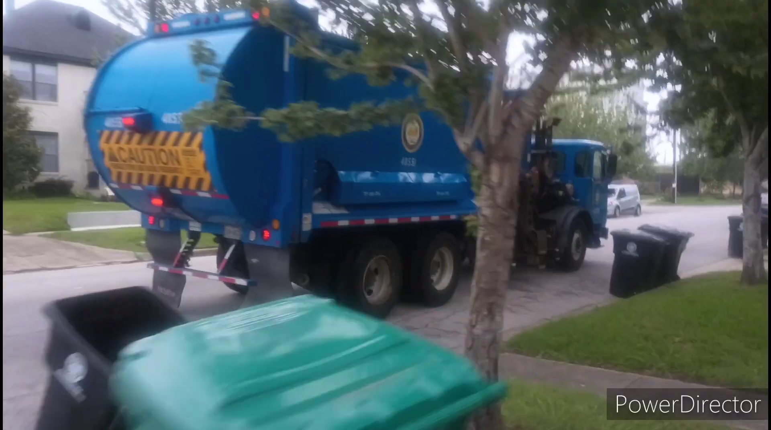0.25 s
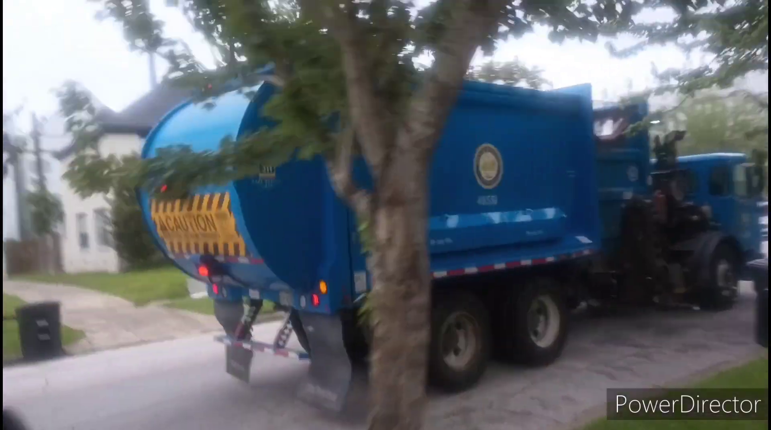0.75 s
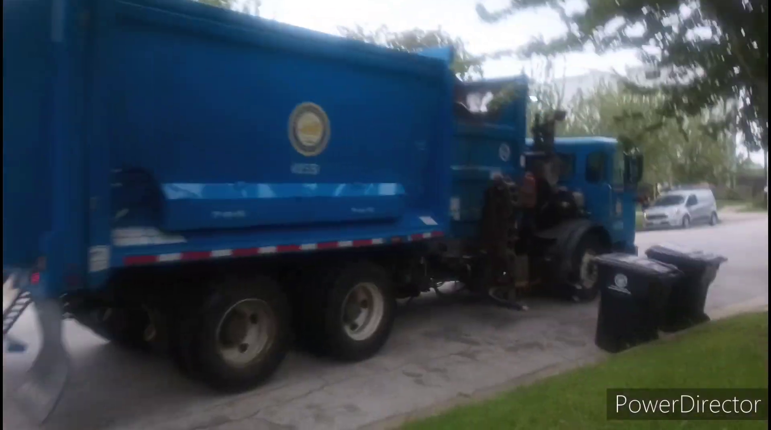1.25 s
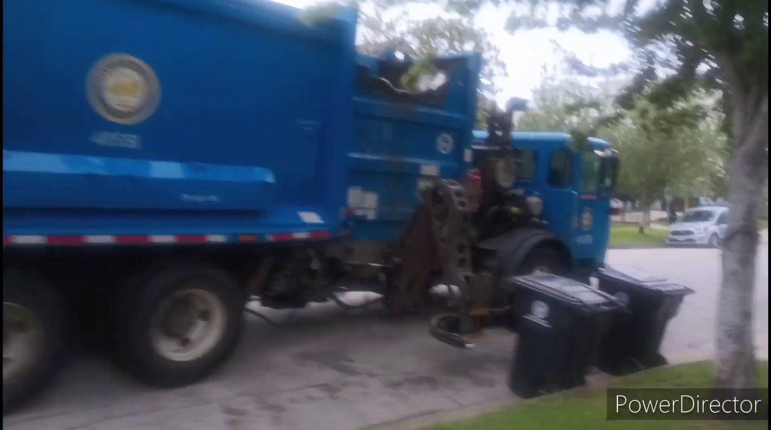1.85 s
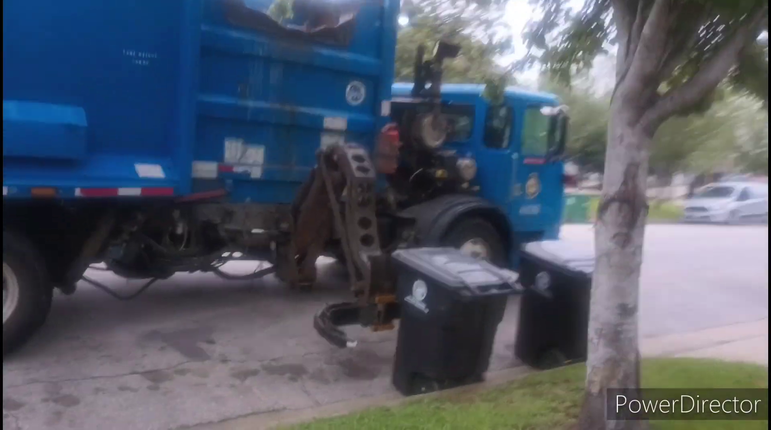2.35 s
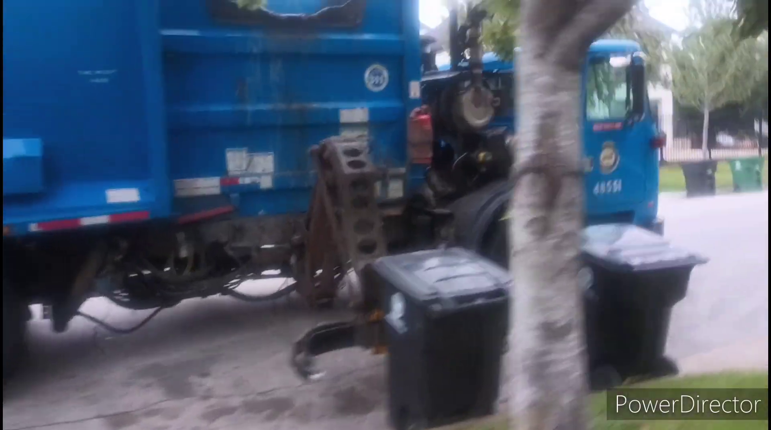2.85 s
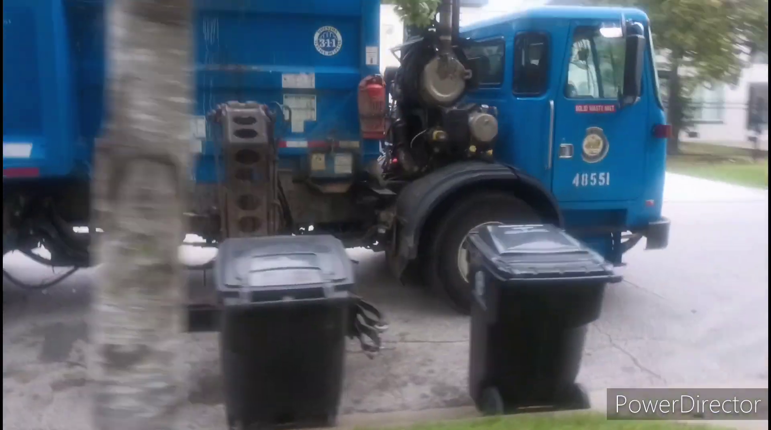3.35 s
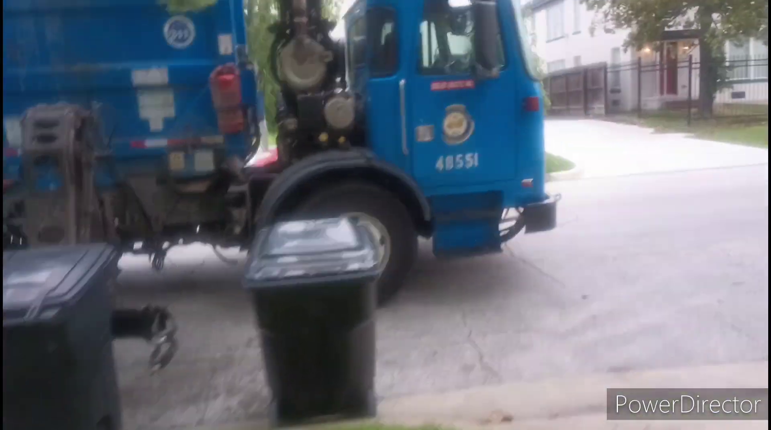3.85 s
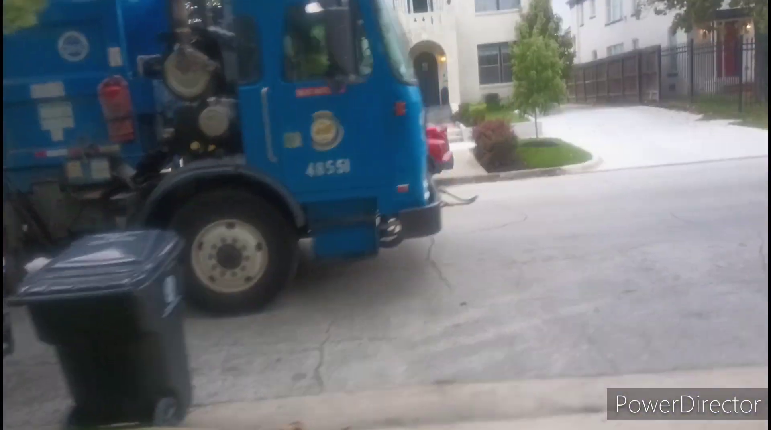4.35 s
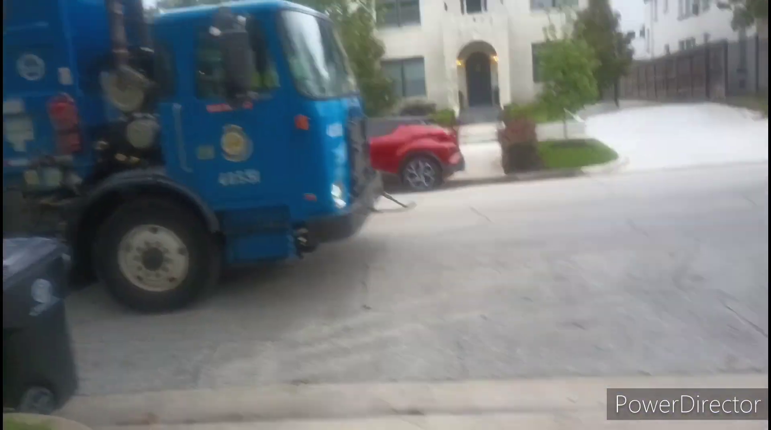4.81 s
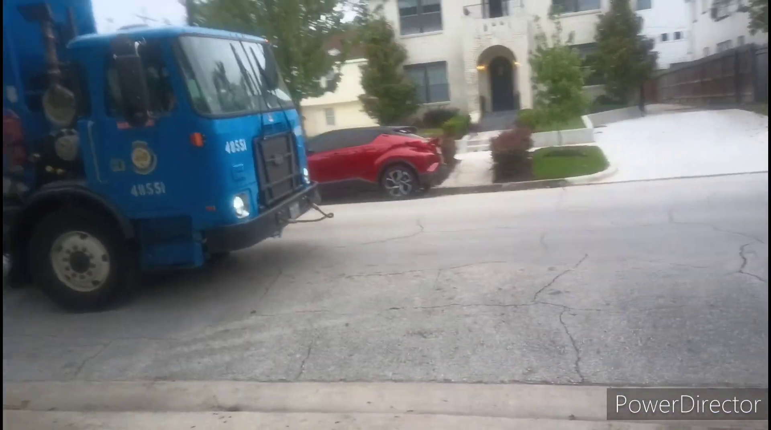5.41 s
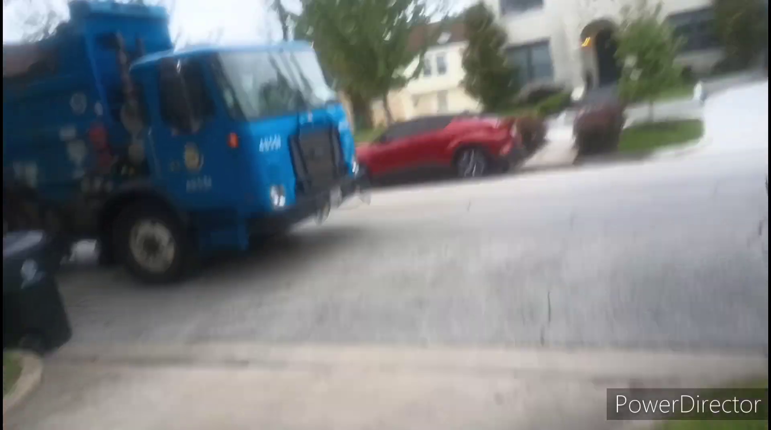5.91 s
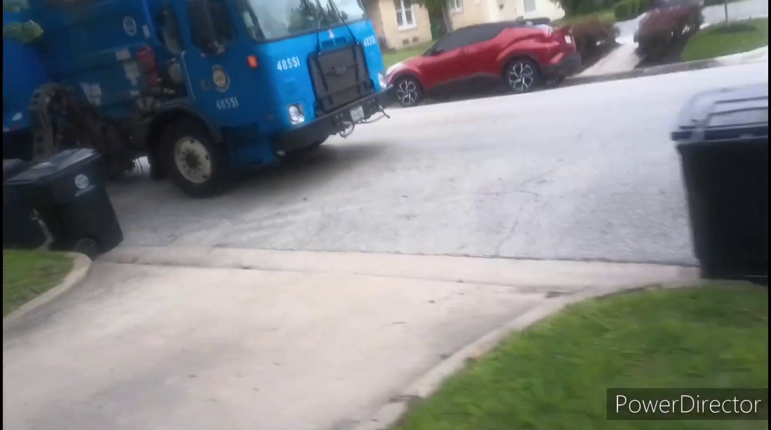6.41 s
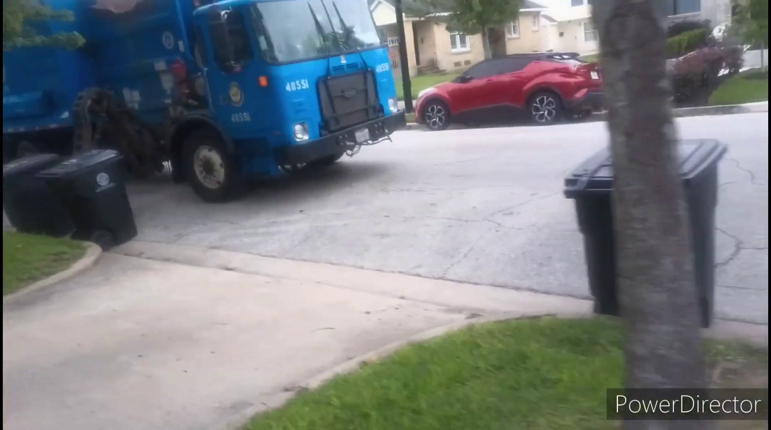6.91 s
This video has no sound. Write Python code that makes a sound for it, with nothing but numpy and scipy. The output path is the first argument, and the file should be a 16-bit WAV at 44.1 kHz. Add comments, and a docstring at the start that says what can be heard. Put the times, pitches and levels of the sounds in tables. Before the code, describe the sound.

Wind buffets the microphone as a diesel garbage truck pulls up with squealing brakes and clanks, idles, then blasts its air brake.

```python
"""Wind buffets the microphone as a diesel refuse truck pulls up; the sound cuts out briefly.
Its brake discs squeal, the steel body clanks and a valve puffs air. The engine idles, heard mostly
from the side, covers buzzing and lifting-arm links clinking. Then the parking brake dumps its air:
a loud blast, and a thin bleed with a falling whistle. The idle ends a little duller and quieter."""
import sys
import numpy as np
from scipy import signal
from scipy.fft import rfft, irfft, next_fast_len
from scipy.io import wavfile
from scipy.ndimage import uniform_filter1d, map_coordinates

SR = 44100
rng = np.random.default_rng(int(sys.argv[2]) if len(sys.argv) > 2 else 0)


def unload_wav(signal):
    """Save mono or channel-first audio to the path in sys.argv[1] as 16-bit WAV at rate SR, clipped to [-1, 1]."""
    wavfile.write(
        sys.argv[1],
        SR,
        np.round(np.clip(np.atleast_2d(signal).T, -1, 1) * 32767).astype(np.int16),
    )


N = 316152
TIME = np.arange(N) / SR
DUMP_S = 4.59  # the parking brake valve opens

# how alike the truck sounds left and right: (frequency [Hz], likeness [0-1])
TRUCK_LIKENESS = [(100, 1), (500, 0.68), (1200, 0.45), (2500, 0.5), (7000, 0.072), (14000, 0.42)]


def amp(db):
    """Decibels to gain."""
    return 10 ** (np.asarray(db) / 20)


def unit(x):
    """Scale so that the mean of the channels has rms 1."""
    return x / np.sqrt(np.mean(np.atleast_2d(x).mean(0) ** 2) + 1e-20)


def along(points, hz):
    """Read (frequency, value) points on a log axis."""
    knots_hz, values = np.transpose(points)
    return np.interp(np.log(hz + 1), np.log(knots_hz + 1), values)


def curves(rows):
    """Automation: one value per sample for each column after the time."""
    times, *columns = np.transpose(rows)
    return [np.interp(TIME, times, column) for column in columns]


def wobble(rate):
    """A smooth random curve, rate knots a second."""
    return map_coordinates(rng.standard_normal(int(N * rate / SR) + 4), [TIME * rate], order=3)


def swell(start, length, rise, t60):
    """Attack, hold and release, all in seconds."""
    age = np.maximum(TIME - start, 0)
    return (1 - np.exp(-age / rise)) * amp(-60 * np.maximum(age - length, 0) / t60)


def filtered(x, response):
    """x through a complex frequency response."""
    size = next_fast_len(N + 8192)
    return irfft(rfft(x, size) * response(np.fft.rfftfreq(size, 1 / SR)), size)[..., :N]


def lowpass(x, edge_hz, slope):
    """Roll off the top at about 6 * slope dB an octave."""
    return filtered(x, lambda hz: 1 / (1 + (hz / edge_hz) ** slope))


def coloured(x, spectrum):
    """x through a (frequency, level) EQ curve, cut away below its first point, at rms 1."""
    low_hz = spectrum[0][0]
    return unit(filtered(x, lambda hz: amp(along(spectrum, hz)) * np.minimum(hz / low_hz, 1) ** 2))


def resonance(hz, centre, width):
    """Complex response of one ringing mode."""
    return 1j * hz * width / (centre ** 2 - hz ** 2 + 1j * hz * width)


def stereo_noise(likeness):
    """White noise whose two sides match by (frequency, likeness) points."""
    def mid_side(hz):
        angle = np.arccos(np.clip(along(likeness, hz), 0, 1)) / 2
        return np.array([np.cos(angle), np.sin(angle)])
    mid, side = filtered(rng.standard_normal((2, N)), mid_side)
    return np.array([mid + side, mid - side])


def lagged(x, lag_ms):
    """Place by arrival time: a positive lag reaches the left later."""
    shift = lag_ms / 1000 * SR / 2  # half to each side
    return np.array([map_coordinates(channel, [np.arange(N) + way * shift], order=5)
                     for channel, way in zip(x, (-1, 1))])


def panned(x, pan_db):
    """Place by level: positive is louder on the left, total power kept."""
    gains = np.array([amp(pan_db / 2), amp(-pan_db / 2)]).reshape(2, -1)
    return x * gains / np.sqrt(np.mean(gains ** 2, 0))


def patchy(x, depth_db, bins=3, frames=11):
    """Shifting reflections: narrow bands swell and fade at random."""
    bands = signal.stft(x, nperseg=1024)[2]
    field = rng.standard_normal(bands.shape[1:])
    field = uniform_filter1d(uniform_filter1d(field, bins, axis=0), frames, axis=1)
    return signal.istft(bands * amp(depth_db * field / field.std()), nperseg=1024)[1][:, :N]


def street(x):
    """Short reverb: scatter from pavement, house fronts and the truck's own sides."""
    # reverb decay: (frequency [Hz], t60 [s])
    decay = [(200, 0.12), (2000, 0.24), (10000, 0.35)]
    hz, t, bands = signal.stft(rng.standard_normal((2, SR // 2)), SR, nperseg=256)
    tail = signal.istft(bands * amp(-60 * t / along(decay, hz)[:, None]), SR, nperseg=256)[1]
    return signal.fftconvolve(x, tail / np.linalg.norm(tail[0]), axes=1)[:, :N]


def wind(lump_db=3, tilt=.31, deep_db=1):
    """Eddies buffet each microphone port on its own; hard gusts sound brighter."""
    # steady wind bed: (time [s], level [dB])
    breeze = [(0, -56), (.3, -52), (.6, -43.5), (1.05, -46), (1.35, -37), (3.1, -40), (4.55, -44),
              (4.74, -68), (5.35, -52.5), (5.7, -49), (7.17, -55.5)]
    # gusts: (start [s], length [s], level [dB], left over right [dB], brightness [dB])
    gusts = [(0.55, 0.083, -42, -22, -1), (1.32, 0.13, -32, 4, -3.5), (1.47, 0.23, -40, -19, 4.5),
             (1.712, 0.046, -29.5, 20, -6), (1.905, 0.09, -35, 21, -1), (2.158, 0.033, -35, -18, -2),
             (2.408, 0.12, -25.5, 26, -2.5), (2.585, 0.09, -33.5, 2, -14), (2.764, 0.31, -39, -8, -3.5),
             (3.15, 0.034, -38, 16, -14), (3.391, .09, -37, 15, -10), (3.488, 0.055, -25, 33, -12.5),
             (3.564, 0.062, -26, 30, 10), (3.661, 0.034, -20.5, 30, -2.5), (3.733, 0.051, -23, 32, 8),
             (3.823, 0.067, -27.5, 22, -2.5), (3.942, 0.2, -26, 30, 0), (4.217, 0.125, -29.5, 26, 3),
             (4.365, 0.2, -35.5, 27, 4), (4.612, 0.071, -34.5, 31, 4), (4.765, 0.52, -50.5, 17, 5.5),
             (5.744, 0.055, -42, -9, -5), (6.425, 0.044, -40, -22, -14)]
    # colour of the buffeting: (frequency [Hz], level [dB])
    rumble_eq = [(15, -59), (25, -29), (70, -1), (139, 3.5), (186, 2), (253, -2.5), (301, -2), (357, -8),
                 (392, -11.5), (600, -32), (780, -72), (1320, -120)]
    power, bright_db = amp(curves(breeze)[0]) ** 2, 0
    for start, length, db, pan_db, gust_bright_db in gusts:
        gust = swell(start, length, rise=.014, t60=.26)
        power = power + panned(amp(db) * gust, pan_db) ** 2
        bright_db = bright_db + gust_bright_db * gust
    strength_db = 10 * np.log10(power) + np.array([wobble(13), wobble(23)])
    lumps = amp(lump_db * np.array([wobble(60), wobble(60)]))
    buffet = coloured(lumps * stereo_noise([(50, .38), (400, .14)]), rumble_eq)
    # level out the slow swings, keeping only the quick eddies
    slow_power = np.abs(uniform_filter1d(buffet ** 2, size=SR // 16))
    buffet = unit(buffet / np.sqrt(slow_power + 1e-9))
    deep = lowpass(buffet, 165, slope=4)
    lift_db = tilt * np.clip(strength_db + 20, -12, 10) + bright_db
    return amp(strength_db) * (deep * amp(deep_db - .44 * lift_db) + (buffet - deep) * amp(lift_db))


def blows(firings, decay, scatter_db, floor, rise=.52):
    """One pulse per firing from six unequal cylinders over a steady floor; times are in firings."""
    cylinder_db = np.array([1.5, -4, 0, -7, .5, -4])
    index = firings.astype(int)
    size = amp(cylinder_db[index % 6] + scatter_db * rng.standard_normal(400)[index])
    age = firings - index
    return unit(floor + size * np.exp(-age / decay) * np.minimum(age / rise, 1))


def block_ring(drive):
    """The firings ring the engine block."""
    # block modes: (frequency [Hz], width [Hz], level [dB])
    modes = [(1046, 25, -7.5), (1800, 40, 5), (1884, 41, -2), (2280, 37, 3.5)]
    strikes = stereo_noise(TRUCK_LIKENESS) * drive
    return unit(filtered(strikes, lambda f: sum(amp(db) * resonance(f, hz, w) for hz, w, db in modes)))


def covers(drive, width_hz=110):
    """The firings set thin covers buzzing and, late on, the grille ringing; each comes and goes at its own
    pitch."""
    # cover buzzes, the last three rows grille resonances: (start [s], length [s], pitch [Hz], level [dB])
    buzzes = [(1.52, 0.19, 1060, -33.5), (1.807, 0.04, 1830, -42), (1.963, 0.58, 1915, -52),
              (1.947, 0.34, 1118, -47), (2.487, 0.2, 1946, -37.5), (2.54, 0.074, 1633, -37),
              (2.49, 1.2, 1047, -47), (2.766, 0.39, 1884, -46), (3.31, 0.12, 1446, -40.5),
              (3.357, 0.27, 1884, -37), (3.362, 0.18, 2120, -42), (3.524, 0.21, 1763, -40),
              (3.4, 1.14, 915, -46), (3.856, 0.53, 1052, -48), (4.011, 0.056, 1755, -41),
              (5.555, 1.44, 716, -53.5), (5.55, 1.8, 910, -57), (5.553, 1.96, 1480, -55.5)]
    out = np.zeros((2, N))
    for start, length, hz, db in buzzes:
        ring = filtered(stereo_noise(TRUCK_LIKENESS) * drive, lambda f: resonance(f, hz, width_hz) ** 2)
        out += amp(db) * swell(start, length, rise=.02, t60=.45) * unit(ring)
    return out


def rattle(firings, chance=.45, spread_db=4, detune=.018, t60=.045, bounce_s=.006):
    """Now and then a firing sets a loose fitting chattering; no two contacts ring quite alike."""
    # loose fittings: (pitch [Hz])
    pitches = [1126, 1340, 1668, 1750, 1870, 2267, 3470, 4340, 5460, 5800, 6460]
    starts = np.flatnonzero(np.diff(firings.astype(int)))
    t = np.arange(SR // 32) / SR
    out = np.zeros(N + SR)
    for hz in pitches:
        shaken = starts[rng.random(len(starts)) < chance]
        for bounce in range(2):
            size, bend, late = rng.standard_normal((3, len(shaken), 1))
            delay = (SR * bounce_s * (bounce + np.abs(late))).astype(int)
            at = shaken[:, None] + delay + np.arange(len(t))
            ring = np.sin(2 * np.pi * hz * (1 + detune * bend) * t) * amp(spread_db * size - 60 * t / t60)
            gain = np.sqrt(pitches[0] / hz) * .5 ** bounce
            out += gain * np.bincount(at.ravel(), ring.ravel(), len(out))
    return unit(out[:N])


def hum(firings):
    """Exhaust and gears sing wavering tones that follow the engine speed."""
    # engine orders: (frequency [multiples of the firing rate], level [dB])
    orders = [(2, -55), (3, -56), (5, -60), (9.33, -56), (18.5, -61), (24.43, -60), (27.93, -61),
              (36.66, -59), (48.85, -68), (61.1, -68)]
    return np.sqrt(2) * sum(
        amp(db + 1.9 * wobble(23)) * np.sin(2 * np.pi * order * firings + .5 * wobble(7.9))
        for order, db in orders)


def engine(dip_db=9.5, flank_db=-1, grille_db=-4, ring_db=-14, tick_db=-8, rattle_db=-4):
    """Combustion knocks the block, injectors tick, fittings rattle, exhaust and gears hum."""
    # engine fader: (time [s], level [dB])
    fader = [(0, -46.5), (.2, -49), (.55, -40), (1.25, -37), (1.65, -29.5), (2, -35.5), (3.2, -37),
             (4.55, -36), (5.65, -41.5), (7.17, -45)]
    # engine speed: (time [s], firing rate [1/s])
    speed = [(0, 38), (2, 38), (2.6, 39.2), (3.5, 38.2), (4.3, 37.6), (7.2, 37.5)]
    # tone blend, mostly the side: (time [s], share of the duller grille sound [0-1])
    grille_share = [(.2, 0.64), (.5, 0), (4.4, 0.15), (5.2, 0.26)]
    # combustion from the side: (frequency [Hz], level [dB])
    flank_eq = [(150, -4), (250, -3.5), (420, 3), (560, 0.5), (700, 1), (900, 0), (1040, 3.5), (1210, -4),
                (1600, 0.5), (2100, -2), (2420, -2.5), (3000, -8.5), (5000, -8), (6500, -51)]
    # combustion through the grille: (frequency [Hz], level [dB])
    grille_eq = [(120, -42), (200, -0.5), (270, -3), (352, -3), (510, -23.5), (620, -16), (715, -4.5),
                 (800, -3.5), (900, -1.5), (1040, -1.5), (1130, -13.5), (1260, -29.5), (1390, -2.5),
                 (1570, -8), (1760, -16), (2230, -14.5), (2550, -33), (3000, -12.5), (4490, -33),
                 (6000, -62.5)]
    # injector tick: (frequency [Hz], level [dB])
    tick_eq = [(1800, -38), (3000, -3), (4500, -4.5), (5700, 2), (6700, 0), (8000, -9), (11000, -14),
               (13700, -17.5), (15200, 0.5), (16000, -32)]
    share, = curves(grille_share)
    # the engine ducks under the air blast
    level_db = curves(fader)[0] - dip_db * swell(DUMP_S, .86, rise=.12, t60=.69)
    treble_db = level_db + tick_db - 15 * share
    firings = np.cumsum(curves(speed)[0]) / SR
    knock = blows(firings, decay=.5, scatter_db=2.5, floor=1)
    # at the grille the fan's steady rush covers much of the knock
    soft_knock = blows(firings, decay=.4, scatter_db=3, floor=2)
    injections = blows(firings, decay=.22, scatter_db=3, floor=.6 + 1.2 * share, rise=.06)
    churn_db = wobble(16) * (1 - .5 * share)
    flank = coloured(patchy(stereo_noise(TRUCK_LIKENESS) * knock, depth_db=2.2), flank_eq)
    grille = coloured(patchy(stereo_noise(TRUCK_LIKENESS) * soft_knock, depth_db=1), grille_eq)
    blend = amp(flank_db) * np.sqrt(1 - share) * flank + amp(grille_db) * np.sqrt(share) * grille
    body = amp(level_db + churn_db) * blend
    clatter = blows(firings, decay=.3, scatter_db=2.5, floor=.2)
    ringing = amp(level_db + ring_db - 11 * share) * block_ring(clatter) + covers(clatter)
    spray = patchy(stereo_noise(TRUCK_LIKENESS) * injections, depth_db=1.9, bins=5, frames=3)
    ticks = amp(treble_db) * coloured(spray, tick_eq)
    fittings = amp(treble_db + rattle_db - 17 * share) * rattle(firings)
    tones = amp(.82 * (level_db + 38.5)) * hum(firings)
    return body + ringing + ticks + fittings + tones


def clinks(level_db=-12.5, wet_db=-8, upper_hz=5200, t60=.042, bounce_s=.005):
    """The engine rocks the lifting arm's loose links; each bounces three times, never quite alike."""
    # clinks: (time [s], level [dB], upper modes [dB])
    hits = [(2.25, -25, -11), (2.455, -25, -8), (2.536, -22, -6), (2.583, -30, 7), (2.632, -32, -2),
            (2.657, -25, 0), (2.758, -35, 6), (2.813, -29.5, 5), (2.917, -30, -4), (2.966, -30, -12),
            (3.226, -35, -2), (3.277, -24, -2), (3.328, -20.5, -10), (3.384, -31.5, 8),
            (3.434, -26.5, -0.5), (3.486, -29, -4), (3.539, -28.5, 3), (3.647, -27, -4), (3.749, -27, -10),
            (3.908, -24, -2), (4.173, -29, 5.5), (4.229, -33, 10), (4.283, -30, -4), (4.385, -28.5, 4.5),
            (4.492, -32, 8), (5.876, -26.5, -8), (5.895, -37, -6)]
    # link modes: (frequency [Hz], level [dB])
    modes = [(4280, -3.5), (4560, 1.5), (4900, -9), (5450, -10), (6250, -5), (6560, 0), (7100, -13)]
    hz, mode_db = np.transpose(modes)[:, :, None]
    t = np.arange(SR // 12) / SR
    attack = 1 - np.exp(-t / .0006)
    out = np.zeros((2, N))
    for start, db, upper_db in hits:
        for bounce in range(3):
            strength, detune, phase, left, right = rng.standard_normal((5, len(modes), 1))
            strike_db = db + mode_db + upper_db * (hz > upper_hz) + 2 * strength - bounce
            envelope = attack * amp(strike_db - 60 * t / t60)
            cycles = hz * (1 + .012 * detune) * t + phase
            swing = np.sin(2 * np.pi * cycles + .7 * np.array([left, right]))
            at = start + bounce_s * (bounce + .5 * rng.random())
            out[:, round(at * SR):][:, :len(t)] += (envelope * swing).sum(1)
    return amp(level_db) * (out + amp(wet_db) * street(out))


def clanks(level_db=-2, ring_db=-7, rise=.0015, t60=.23, rebound_s=.013, rebound_db=-4):
    """Loose steel strikes twice a knock, chattering and ringing the body's modes at new strengths."""
    # body and lifting arm knocks: (time [s], level [dB], treble [dB], boom [dB])
    knocks = [(0.568, -33, 9, 2), (.595, -37.5, 8, 16.5), (.752, -22.5, -1, -4), (.772, -28, 4, 7),
              (.828, -23.5, 0, -7), (.838, -23.5, -0.5, -11), (1.474, -20.5, 1, -2),
              (1.521, -16.5, 4.5, -3), (1.533, -20, -3.5, -11), (1.55, -28, 0, 10), (1.583, -20.5, -1.5, 0),
              (1.63, -36.5, 8.5, 16), (1.673, -31.5, 7.5, 13.5), (1.751, -34.5, 6, 13),
              (1.855, -31, -7, -6), (1.925, -39, -17, 10), (2.54, -28.5, -1, -18), (2.582, -39, -3, -10),
              (2.657, -43, 6, -8), (2.704, -29.5, -14, -1), (2.912, -34, -22, 7), (2.998, -31, -21, -6),
              (3.463, -30.5, -11, -6), (4.228, -43, -16, -3)]
    # panel chatter: (frequency [Hz], level [dB])
    panel_eq = [(120, -34), (250, -9), (420, 6), (520, -1.5), (720, 7), (920, -15), (1150, 11.5),
                (1500, 5.5), (2200, 7), (3600, 3.5), (5400, -2.5), (6600, 1.5), (8000, -20), (16000, -29)]
    # body and arm modes: (frequency [Hz], spread [Hz], level [dB])
    modes = [(473, 127, -7), (753, 110, 0), (1067, 130, 1), (1335, 178, -0.5), (1595, 200, -1),
             (1905, 122, 1.5), (2180, 270, -3.5), (3030, 360, -1), (3725, 373, 0), (4200, 500, -2),
             (5800, 730, -2)]
    boom_hz, treble_hz = 900, 2500
    hz, spread, mode_db = np.transpose(modes)[:, :, None]
    t = np.arange(SR // 3) / SR
    band_power, ring = np.zeros((3, N)), np.zeros((2, N))
    for start, db, treble_db, boom_db in knocks:
        for bounce in range(2):
            at = round((start + bounce * rebound_s) * SR)
            attack = amp(db + bounce * rebound_db) * (1 - np.exp(-t / rise))
            burst = attack * amp(-60 * t / t60)
            band_power[:, at:at + len(t)] += np.outer(amp([boom_db, 0, treble_db]), burst) ** 2
            strength, detune, phase = rng.standard_normal((3, len(modes), 1))
            swing = np.sin(2 * np.pi * ((hz + .5 * spread * detune) * t + phase))
            colour_db = boom_db * (hz < boom_hz) + treble_db * (hz > treble_hz)
            partials = amp(mode_db + colour_db + 2 * strength - 60 * t / (.5 * t60)) * swing
            ring[:, at:at + len(t)] += amp(ring_db) * attack * partials.sum(0)
    grit = patchy(stereo_noise(TRUCK_LIKENESS), depth_db=5) * amp(2.34 * wobble(300))
    steel = coloured(grit, panel_eq)
    boom, low = lowpass(steel, boom_hz, slope=4), lowpass(steel, treble_hz, slope=4)
    bands = boom, low - boom, steel - low
    chatter = sum(band * np.sqrt(power) for band, power in zip(bands, band_power))
    return amp(level_db) * (chatter + ring + street(ring))


def squeals(main_db=3.5, chirp_db=3, wet_db=-9):
    """Stick-slip holds one brake mode and catches others briefly; each bends and flutters on its own."""
    # main squeal: (time [s], pitch [Hz], level [dB])
    main = [(.62, 9480, -44), (.68, 9740, -28), (.76, 9820, -28), (.8, 9690, -19), (.87, 9830, -20),
            (.92, 10150, -23), (.96, 10220, -26), (1.03, 10140, -21), (1.15, 9830, -32)]
    # other brake modes and dry joints:
    # (start [s], length [s], pitch [Hz], glide [Hz], level [dB], phase jitter [rad])
    chirps = [(.525, .05, 15100, 0, -47, .5), (.58, .15, 540, -200, -41, 1.3),
              (.768, .045, 540, 60, -33.5, 1.1), (.825, .05, 5060, 0, -35, .6),
              (.58, .14, 14550, -450, -47.5, .6), (.65, .13, 13950, -400, -49, .7),
              (.68, .08, 10980, 100, -43, .5), (.72, .17, 14700, 650, -36.5, .6),
              (.74, .22, 12110, 300, -36.5, .6), (.765, .08, 6640, -80, -32, .6),
              (.82, .13, 10500, 0, -35, .7), (.9, .11, 13480, -100, -35, .5),
              (.918, .05, 1345, 110, -33, 1.1), (1.003, .028, 680, 0, -37.5, .5),
              (1.036, .05, 670, -10, -41.5, .6), (1.05, .08, 10950, -200, -32, .7),
              (1.092, .062, 650, 60, -35, .5), (1.09, .06, 1220, 30, -35, .8), (1.1, .06, 8130, 0, -37, .6),
              (1.16, .04, 12740, -200, -32, .6), (1.215, .06, 12120, -220, -32, .5),
              (1.255, .105, 12000, 0, -29.5, .4), (1.35, .08, 12060, 120, -32.5, .4),
              (1.16, .28, 2200, -70, -42, 1), (1.36, .045, 2160, 0, -37, .5),
              (1.34, .035, 1090, 0, -38, .6), (1.43, .06, 1070, 0, -37, .6), (2.22, .08, 4980, 0, -46, .7),
              (1.488, .03, 5780, 0, -23, .4), (1.68, .04, 6420, -80, -37, .5),
              (2.02, .38, 5020, -80, -49.5, 1.1), (3.125, .045, 1033, 0, -35, .5),
              (3.902, .022, 4600, 0, -39, .4)]
    pitch, level_db = curves(main)
    held = swell(main[0][0], main[-1][0] - main[0][0], rise=.0035, t60=.099)
    flutter = amp(2 * wobble(140) + 2 * wobble(45))
    squeal = np.sin(2 * np.pi * np.cumsum(pitch) / SR + .55 * wobble(290))
    out = amp(level_db + main_db) * held * flutter * squeal
    for start, length, hz, glide_hz, db, jitter_rad in chirps:
        t = np.arange(round(length * SR)) / SR
        progress = t / length
        grip, jitter = [map_coordinates(rng.standard_normal(400), [t * rate]) for rate in (110, 350)]
        phase = 2 * np.pi * np.cumsum(hz + glide_hz * (progress - .5)) / SR
        envelope = amp(db + chirp_db + 3 * grip) * np.sqrt(4 * progress * (1 - progress))
        out[round(start * SR):][:len(t)] += envelope * np.sin(phase + jitter_rad * jitter)
    direct = np.array([out, out])
    return panned(direct + amp(wet_db) * street(direct), pan_db=4)


def vent(rise=.046, t60=.47):
    """The service brake valve puffs air under the chassis."""
    # puffs: (start [s], length [s], level [dB])
    puffs = [(0.948, 0.15, -22.5), (1.13, 0.093, -27), (1.336, 0.059, -33.5)]
    # valve hiss: (frequency [Hz], level [dB])
    hiss_eq = [(1000, -47), (2300, -8), (3200, 0.5), (4600, 1.5), (6500, 1), (8000, -7), (11000, 0.5),
               (13500, -6), (15000, -2), (16000, -16.5)]
    air = patchy(stereo_noise([(2000, .17), (12000, .2)]), depth_db=3)
    envelope = sum(amp(db) * swell(start, length, rise, t60) for start, length, db in puffs)
    return envelope * amp(wobble(32.27)) * coloured(air, hiss_eq)


def edge_tone(start, length, hz, glide_hz, width_hz, db):
    """Air over an edge sings in a narrow, fluttering band that swells, glides and fades."""
    progress = np.clip((TIME - start) / length, 0, 1)
    envelope = 4 * progress * (1 - progress)
    phase = 2 * np.pi * np.cumsum(hz + glide_hz * (progress - .5)) / SR
    breath = lowpass(stereo_noise([(100, .41)]), width_hz, slope=2)
    flutter = amp(2 * wobble(70))
    return amp(db) * envelope * unit(flutter * breath * np.sin(phase))


def hoot(start=4.772, length=.03, hz=556, sag_hz_per_s=330, db=-33):
    """The valve's exhaust pipe sounds one short, sagging, fluttering note."""
    pitch = hz - sag_hz_per_s * np.clip(TIME - start, 0, 1)
    flutter = amp(1.5 * wobble(120))
    tone = np.sin(2 * np.pi * np.cumsum(pitch) / SR + .5 * wobble(110))
    return amp(db) * swell(start, length, rise=.012, t60=.33) * flutter * tone


def air_brake(lag_ms=-.4275, shade_db=10):
    """The brake chambers empty in a turbulent jet on the left; the whistle falls with the pressure."""
    # main jet: (frequency [Hz], level [dB])
    jet_eq = [(1650, -68), (2800, -32), (3510, -6.5), (4340, -4), (4800, -6), (5200, -3), (5680, -2.5),
              (6820, -3.5), (7940, -8.5), (9130, -6), (13400, -12.5), (14900, -6.5), (15500, -3),
              (16000, -6.5)]
    # lower roar, slow to build: (frequency [Hz], level [dB])
    roar_eq = [(1100, -31), (1500, -19), (1850, -1), (2200, -5), (2750, 1.5), (3300, -4.5), (4200, -52)]
    # thin last stream: (frequency [Hz], level [dB])
    bleed_eq = [(1200, -16), (1850, -8), (2700, -7), (3700, -3), (5000, -1.5), (7000, 2), (9500, -0.5),
                (13400, -15), (15500, 1)]
    # air singing in valve and pipe, the falling whistle last:
    # (start [s], length [s], pitch [Hz], glide [Hz], half-width [Hz], level [dB])
    whistles = [(4.74, .19, 4300, 100, 170, -27), (4.63, .5, 6900, -50, 110, -31),
                (4.89, .11, 1830, 0, 50, -35), (5, .26, 2820, -200, 90, -36),
                (5.12, .32, 2300, -700, 200, -43), (5.26, .35, 6250, -4500, 200, -39.5)]
    likeness = [(2000, .5), (7000, .45), (14000, .3)]
    air, stream = [lagged(patchy(stereo_noise(likeness), depth_db=1.8), lag_ms) for _ in range(2)]
    jet = coloured(air, jet_eq)
    low = lowpass(jet, 8500, slope=6)
    # the microphone's housing shades the right port from the treble
    jet = panned(low, pan_db=1) + panned(jet - low, shade_db)
    blast = amp(-18) * swell(DUMP_S, .39, rise=.051, t60=.97) * jet
    roar = amp(-26) * swell(DUMP_S, .42, rise=.2, t60=.95) * coloured(air, roar_eq)
    bleed = amp(-34.5) * swell(DUMP_S, .83, rise=.051, t60=1.5) * coloured(stream, bleed_eq)
    tones = sum(edge_tone(*whistle) for whistle in whistles) + hoot()
    return blast + panned(roar, pan_db=4) + panned(bleed + tones, pan_db=3)


def scene():
    """The truck drifts a little across the stereo field; the squeals stay nearly ahead."""
    # the truck's direction: (time [s], left-side lag [ms])
    bearing = [(0, -0.11), (.5, 0.1), (1.6, 0.11), (2.3, 0.032), (3.3, 0.025), (4.3, -0.095), (5.8, -.13),
               (7.2, -0.08)]
    truck = lagged(engine() + clanks() + clinks(), curves(bearing)[0])
    brakes = lagged(squeals(), lag_ms=.017)
    return truck + brakes + vent() + air_brake() + wind()


def record(dry, mute_s=.16, resume_s=.535, fade_s=.03, top_hz=15650):
    """The sound cuts out for a moment and fades back in; the very top is cut off."""
    gate = (TIME < mute_s) + np.clip((TIME - resume_s) / fade_s, 0, 1)
    return filtered(dry * gate, lambda hz: np.clip((top_hz - hz) / 200 + .5, 0, 1))


dry = scene()
out = record(dry)
unload_wav(out)
```